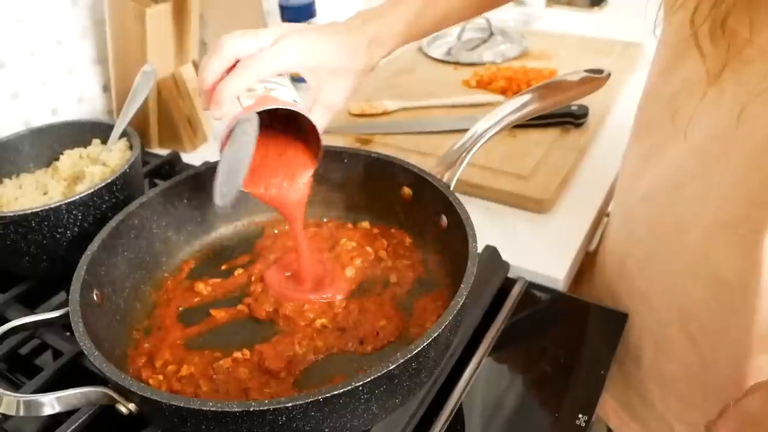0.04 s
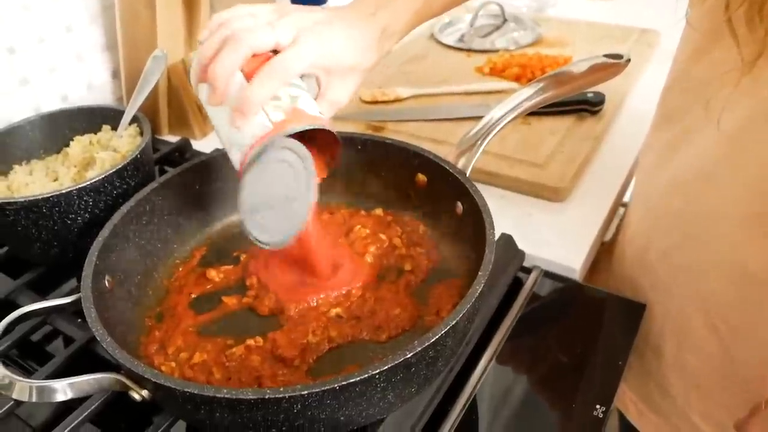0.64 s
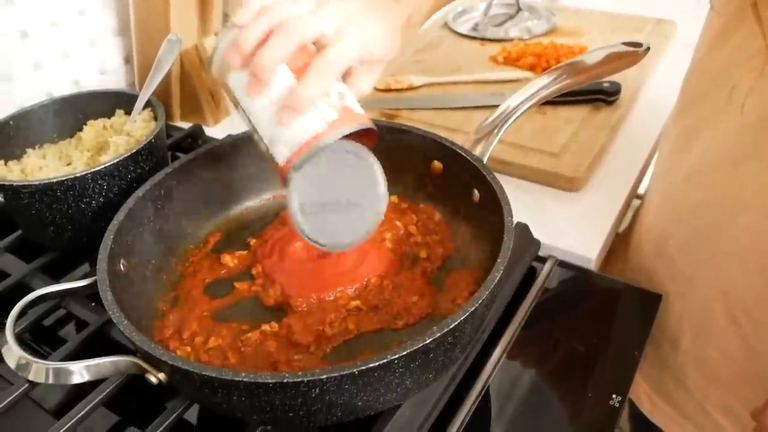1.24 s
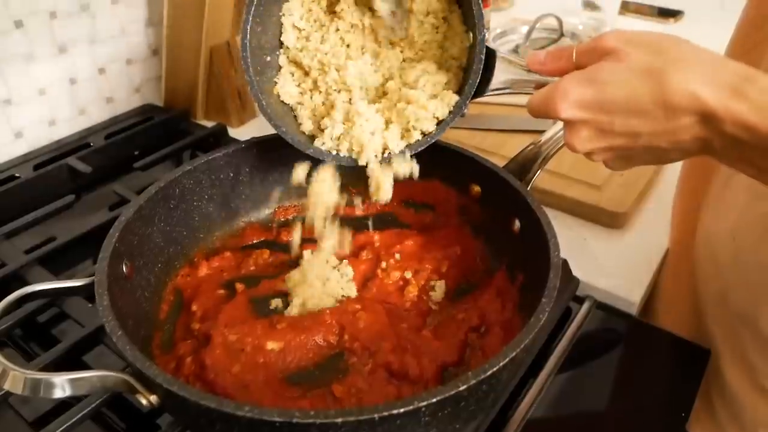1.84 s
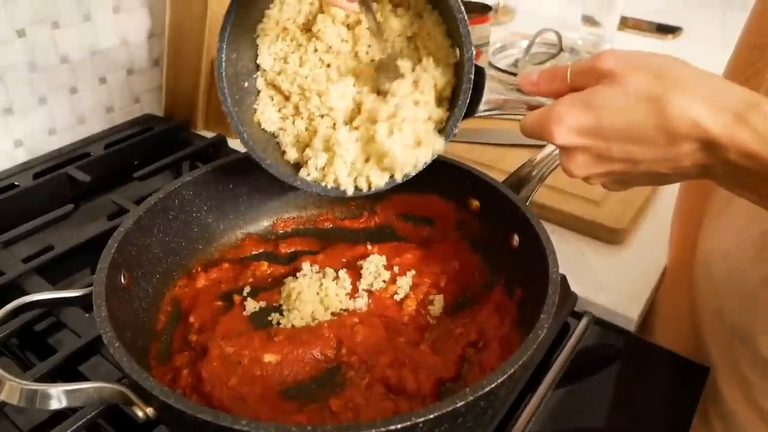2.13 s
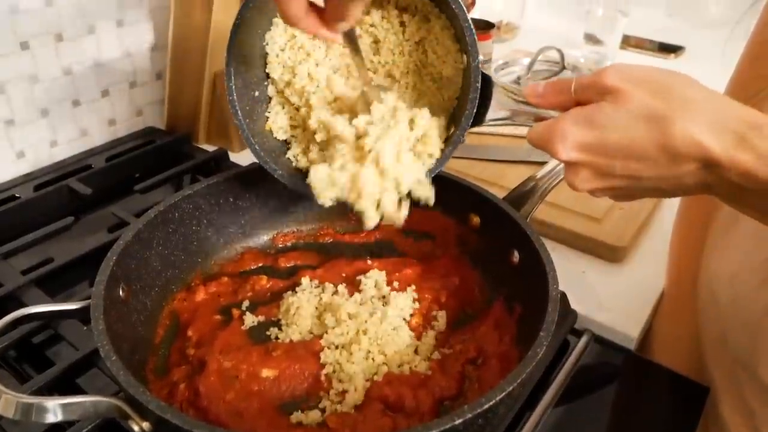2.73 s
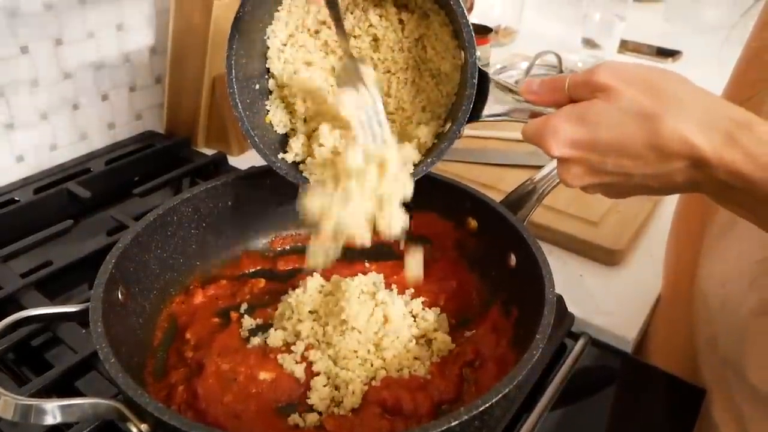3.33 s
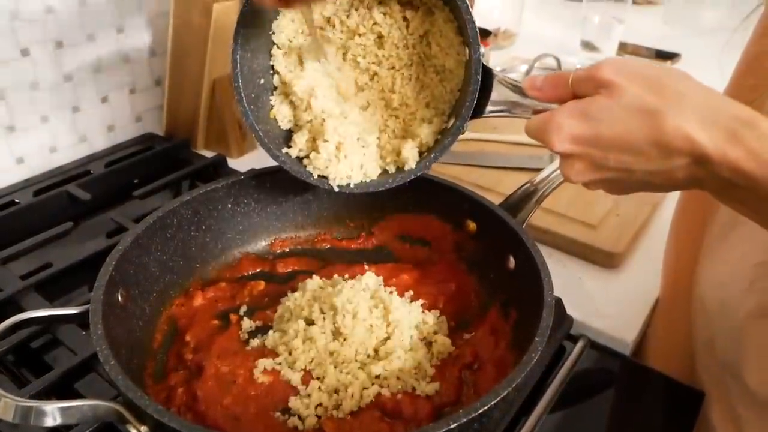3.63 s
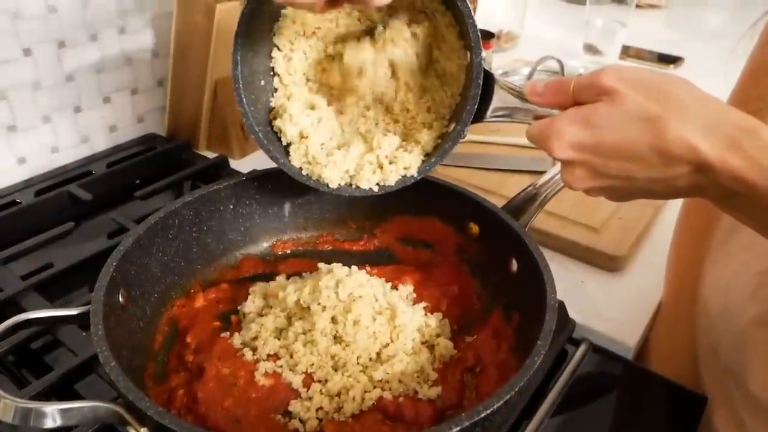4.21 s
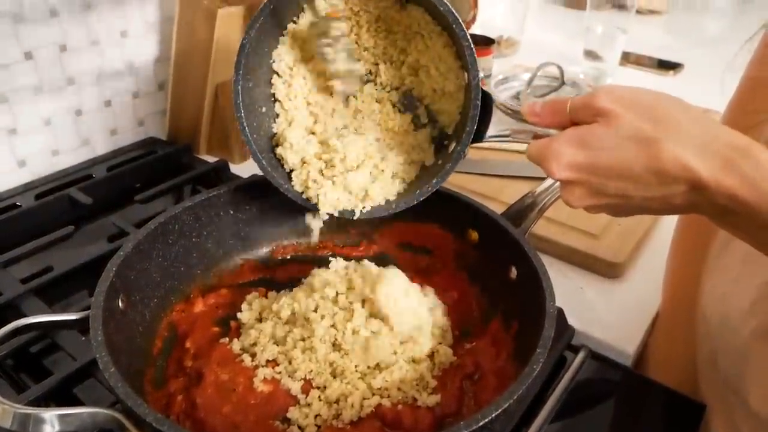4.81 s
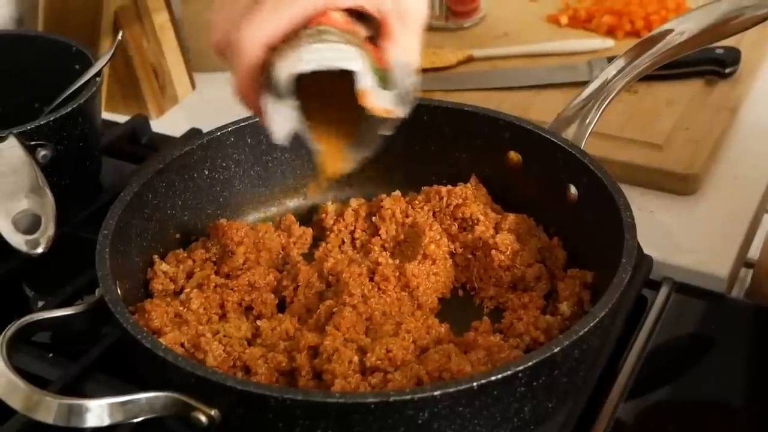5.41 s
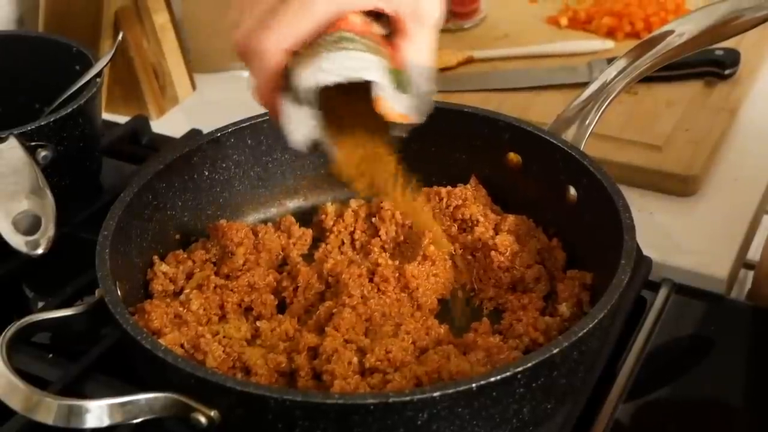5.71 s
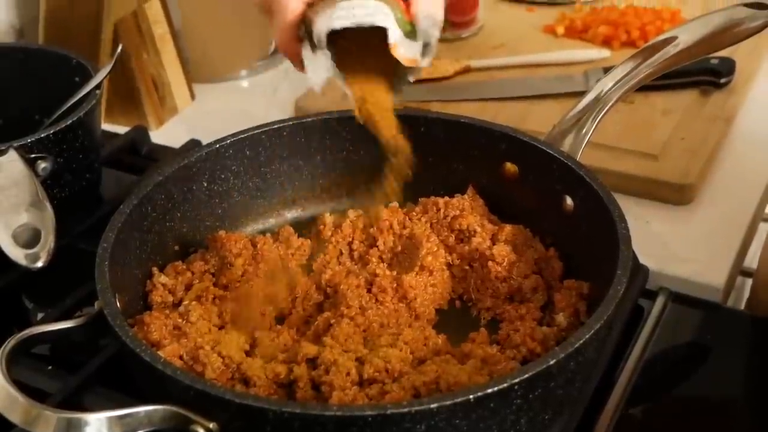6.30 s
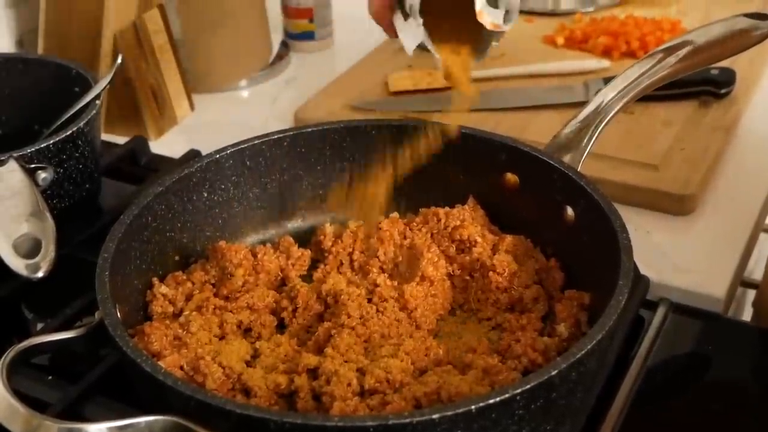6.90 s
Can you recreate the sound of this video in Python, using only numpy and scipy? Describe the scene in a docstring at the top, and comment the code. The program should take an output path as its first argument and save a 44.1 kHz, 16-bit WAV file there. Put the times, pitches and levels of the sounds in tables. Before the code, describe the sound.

Close sizzling cuts to a pot knocking a pan and a fork scraping out grain, followed by the soft rustle of shaken spice.

```python
"""Cooking at a home stove

Close to the pan in a kitchen, everything centred on a stereo microphone; three moments, changing abruptly.
Tomato sauce fries in pops and steam bubbles. A pot bumps the pan, and a fork clinks, scrapes and
squeaks on the steel as it pushes cooked grain out. Then ground spice is shaken from a small box.
A faint sizzle lies under the last two moments, and an appliance hums in the background throughout."""
import sys
import numpy as np
from scipy import signal
from scipy.fft import rfft, irfft
from scipy.io import wavfile
from scipy.ndimage import uniform_filter1d

SR = 44100
rng = np.random.default_rng(int(sys.argv[2]) if len(sys.argv) > 2 else 0)


def store_wav(level_fs):
    """Save 16-bit WAV to argv[1]."""
    pcm = np.round(np.clip(np.atleast_2d(level_fs), -1, 1) * 32767)
    wavfile.write(sys.argv[1], SR, pcm.T.astype(np.int16))


N = 315315
T = np.arange(N) / SR
SAUCE_END_S, SPICE_START_S = 1.652, 5.017

# fierce frying, heard close: frequency_hz, density_db
SAUCE_SPECTRUM = [(180, -58), (300, -16), (492, -8.5), (517, -6.5), (892, -9), (1090, -3.5), (1370, -5.5),
                  (1640, -7.5), (2400, -9), (4800, -4), (6680, -8), (8560, -4), (10600, -13), (13100, -9),
                  (15500, -16.5)]
# the pan under the sauce: pitch_hz, width_hz, level_db
SIZZLE_RESONANCES = [(825, 25, 9.5), (1062, 116, 5.5), (1250, 80, -3), (1570, 170, 7)]
# the fork strikes the pot: start_s, level_db, depth in the grain (0 bare, 1 buried)
FORK_BLOWS = [(2.141, -18, 0.94), (2.778, -22, 0), (3.2605, -1.5, 0.09), (3.807, -12, 0.71),
              (3.845, -16, 0.56), (4.427, -15, 1), (4.986, -24, 0.65)]
# the fork drags along the pot wall: start_s, length_s, level_db
FORK_SCRAPES = [(2.151, 0.059, -16.5), (3.807, 0.056, -22.5), (4.503, 0.066, -17.5)]
# the pot under the fork: pitch_hz, level_db, t60_s
POT_MODES = [(647, -38, 0.41), (1566, -3, 0.07), (1594, -17, 0.25), (1630, -23, 0.26), (2710, -17, 0.028),
             (2977, -18, 0.024), (2970, -36, 0.33), (2945, -16.5, 0.042), (3070, -36, 0.5),
             (4420, -21.5, 0.066), (4590, -29, 0.2), (5280, -13, 0.028), (5810, -15.5, 0.03),
             (6750, -37, .1), (6730, -26, 0.11), (7700, -17.5, 0.024), (8870, -17.5, 0.025),
             (9840, -35.5, 0.22), (11380, -26.5, 0.089), (12480, -33, 0.09)]
# the pot's dense, bright ring: frequency_hz, density_db
STEEL_SPECTRUM = [(400, -5), (700, 4), (1100, -3.5), (2000, -9), (2750, 8), (3700, -5.5), (5300, -2.5),
                  (7000, 0), (8300, -22), (9500, -4), (10700, -20), (12500, -14), (15500, -18)]
# the dull thud of its load of grain: frequency_hz, density_db
THUD_SPECTRUM = [(260, -8.5), (420, 8.5), (650, 1.5), (1100, 4), (1700, -62), (4000, -57)]
# pot and pan knocked together: pitch_hz, level_db, t60_s
BUMP_MODES = [(447, -25, 0.62), (503, -12.5, 0.07), (542, -29, 0.98), (564, -27.5, 0.61), (638, -25, 0.59),
              (730, -28.5, 0.84), (836, -24, 0.41), (994, -21, 0.6), (1002, -5, 0.072), (1087, -26.5, 0.54),
              (1220, -30, 0.24), (1464, -5, 0.051), (1716, -25.5, 0.54), (1950, -31, 0.35),
              (2210, -33.5, 0.42), (2460, -29.5, 0.46), (3330, -31, 0.18), (3500, -47, 0.98)]
# the first crack of that bump: frequency_hz, density_db
CRACK_SPECTRUM = [(440, -3), (700, -6), (1300, -1), (2800, -7), (4300, -16), (5600, -14), (7000, -23),
                  (9000, -21), (11000, -35), (15000, -38)]
# the stove grate rattling under it: frequency_hz, density_db
GRATE_SPECTRUM = [(85, -15.5), (150, -8.5), (300, -7.5), (500, -7), (1000, -9), (1500, -9.5), (2400, -20),
                  (3500, -24.5), (6000, -43), (15000, -100)]
# low resonances of stove and room: pitch_hz, level_db, t60_s
BOOM_MODES = [(104, -48, 1.2), (171, -34, .9), (232, -38, 1.6), (323, -37, 1.9)]
# the fork's tip squeaks on the pot wall: start_s, length_s, level_db, swell_db, rasp_db, groan_db
FORK_SQUEAKS = [(4.194, 0.02, -25, -4, -6, -21), (4.219, 0.0071, -16, -2, -7, -25),
                (4.231, 0.067, -14, -0.5, -6.5, -29), (4.983, 0.027, -22.5, 2, -15, -15.5)]
# the rasp of the slipping tip: frequency_hz, density_db
RASP_SPECTRUM = [(300, -6), (450, 6), (800, -11), (1500, -1.5), (2700, 11.5), (5000, -6), (7300, 2),
                 (8300, -9), (8850, 7), (9400, -7), (10400, -21), (11700, -6), (12350, -3), (15500, -25)]
# the pot's hollow groan under the tip: frequency_hz, density_db
GROAN_SPECTRUM = [(330, -10.5), (430, -4), (560, -14.5), (1000, -32.5)]
# the tines' after-ring, a cluster of close modes: frequency_hz, density_db
TINE_SPECTRUM = [(1200, -40), (2050, -11), (2260, -3), (2330, -2), (2400, -8), (2600, -23), (4000, -39)]
# thin ticks of grain and fork tip: start_s, level_db
GRAIN_TICKS = [(2.434, -38.5), (2.468, -42), (4.4296, -28.5), (4.862, -41.5), (4.913, -39)]
# their crisp colour: frequency_hz, density_db
TICK_SPECTRUM = [(2000, -11), (5000, 0), (9000, -1), (10500, -8), (12500, 3), (15500, -9)]
# short soft tones between the strokes: start_s, length_s, pitch_hz, level_db
SOFT_TONES = [(1.821, 0.044, 727, -38.5), (2.349, 0.077, 719, -42.5), (2.783, 0.068, 641, -47.5),
              (2.995, 0.083, 711, -50.5)]
# vigour of the shaking, as loudness of the powder: time_s, level_db
SHAKE_VIGOUR = [(5.05, -50.5), (5.25, -56.5), (5.65, -46.5), (5.95, -45.5), (6.25, -48.5), (6.5, -52.5),
                (6.8, -51), (7.1, -51.5)]
# sliding powder: frequency_hz, density_db
POWDER_SPECTRUM = [(600, -0.5), (1700, 1.5), (2700, 0.5), (5000, 1.5), (7000, 1), (8700, 5), (10700, -6),
                   (13000, 1), (15500, -5.5)]
# the box knocks in the hand on the harder turns: start_s, level_db
BOX_KNOCKS = [(5.026, -41.5), (5.409, -42.5), (5.792, -41), (6.031, -44), (6.069, -42), (6.209, -43),
              (6.428, -40), (6.634, -43)]
# the hollow box: frequency_hz, density_db
BOX_SPECTRUM = [(200, -35), (600, -4), (1200, 5), (1800, 0), (2800, -7.5), (6000, -13), (15000, -30)]
# faint frying under the grain: frequency_hz, density_db
SIMMER_SPECTRUM = [(1500, -3), (3000, -7), (4700, -0.5), (6800, -4.5), (8600, -0.5), (10600, -11),
                   (13000, -8), (15500, -14.5)]
# the kitchen's room tone: frequency_hz, density_db
ROOM_SPECTRUM = [(20, -2.5), (60, 3), (105, -6.5), (210, -0.5), (330, -3), (600, -1.5), (1100, -2.5),
                 (1350, -7), (1650, -5.5), (2400, -14.5), (5000, -19.5), (15000, -44)]
# partials of the appliance's hum: pitch_hz, level_db
HUM_PARTIALS = [(263.8, -72.5), (527.6, -59), (1093, -72), (1669, -71)]
# room tone that differs between left and right: frequency_hz, density_db
DIFFUSE_SPECTRUM = [(20, -16), (70, -13), (200, -10.0), (1500, -15.5), (15000, -18.5)]


def sauce(level_db=-39.5, bubble_db=-16, pan_db=-3):
    """Fierce, steady frying up close: thousands of pops a second and larger bubbles ring the pan."""
    pops = crackle(rate=7000, spread_db=1.0) + undb(bubble_db) * unit(bubbles())
    sizzle = colour(pops, SAUCE_SPECTRUM)[:int(SAUCE_END_S * SR)]
    pan = sum(undb(db) * signal.lfilter(*signal.iirpeak(hz, hz / width, fs=SR), sizzle)
              for hz, width, db in SIZZLE_RESONANCES)
    out = np.zeros(N)
    add(out, 0, unit(sizzle + undb(pan_db) * pan))
    return out * undb(level_db + 0.31 * walk(20))


def bubbles(count=1500, low_hz=1820, high_hz=9000, cycles=7, spread_db=1.0):
    """Steam bubbles burst in the sauce, each ringing a few cycles at its own pitch."""
    out = np.zeros(N)
    for when, pitch, size in rng.random((count, 3)):
        hz = low_hz * (high_hz / low_hz) ** pitch
        turns = hz * T[:int(2 * cycles * SR / hz)]
        ping = np.exp(-np.pi * turns / cycles) * np.sin(2 * np.pi * turns)
        add(out, when * SAUCE_END_S, undb(-spread_db * np.log(size)) * ping)
    return out


def fork(bare_thud_db=-45, buried_thud_db=-12.5):
    """Blows ring the steel and thud in the grain; scrapes ring it with a run of tiny catches."""
    out = np.zeros(N)
    for at, db, depth in FORK_BLOWS:
        thud_db = bare_thud_db + depth * (buried_thud_db - bare_thud_db)
        add(out, at, undb(db) * (steel(depth) + undb(thud_db) * burst(THUD_SPECTRUM, t60=0.067)))
    for at, length, db in FORK_SCRAPES:
        size = int(length * SR)
        catches = crackle(rate=890, spread_db=-1, size=SR)[:size] * signal.windows.tukey(size, .5)
        add(out, at, undb(db) * signal.fftconvolve(catches / np.sqrt(size), steel(depth=0.4)))
    return out


def steel(depth, buried_mute_db=-28.5, ring_db=-5, tick_db=-19, room_db=-39):
    """The pot's answer to one touch of the fork; grain round the fork mutes the low modes."""
    modes = ring(POT_MODES, low_db=buried_mute_db * depth, detune=0.0046, scatter_db=2.5)
    tick = undb(tick_db) * burst(STEEL_SPECTRUM, t60=0.087)
    room = undb(room_db) * burst(STEEL_SPECTRUM, t60=0.7)
    return undb(ring_db) * no_bass(modes, hz=400) + tick + room


def pot_bump(crack_db=-14, rattle_db=-26, room_db=-47, boom_db=-1, build_s=0.019):
    """The heavy pot hits the pan: a crack, ringing metal, a rattling grate, then a lingering boom."""
    tail = signal.sosfilt(signal.butter(2, 700, fs=SR, output="sos"), burst(GRATE_SPECTRUM, t60=6.8))
    build = 1 - np.exp(-T[:2 * SR] / build_s)
    boom = (undb(boom_db) * ring(BOOM_MODES) + undb(room_db) * tail) * build
    blow = ring(BUMP_MODES) + undb(crack_db) * burst(CRACK_SPECTRUM, t60=0.067)
    rattle = undb(rattle_db) * burst(GRATE_SPECTRUM, t60=1.0)
    out = np.zeros(N)
    add(out, at=1.8605, sound=no_bass(blow, hz=250) + rattle + boom)
    return out


def squeaks(pitch_hz=2310, slips_per_s=92, tine_lag_s=.0014, light_fade_db=-12, pressed_fade_db=-9,
            light_rasp_db=-9, tine_ring_db=-68, room_db=-58):
    """The tip catches and slips as pressure swells and eases; the tines chatter and the steel rings on."""
    out = np.zeros(N)
    lag = np.exp(-T[:SR // 20] / tine_lag_s)
    for at, length, db, swell_db, rasp_db, groan_db in FORK_SQUEAKS:
        pressure = np.sin(np.pi * np.minimum(T[:SR] / length, 1))
        slip_progress = np.cumsum(slips_per_s * (1 + .1 * walk(78, size=SR))) / SR % 1
        # each slip dies away, less so under pressure
        fade_db = slip_progress * (light_fade_db + pressure * (pressed_fade_db - light_fade_db))
        grip = undb(db + swell_db * (pressure - 1) + fade_db) * (T[:SR] < length)
        envelope = signal.fftconvolve(grip, lag / lag.sum())[:SR]  # the tines lag behind the grip
        phase = 2 * np.pi * np.cumsum(pitch_hz * (1 + 0.033 * walk(620, size=SR))) / SR
        friction = rng.standard_normal(SR) * (1 + np.cos(phase))  # rasps once a cycle
        rasp = undb(rasp_db + light_rasp_db * (1 - pressure)) * colour(friction, RASP_SPECTRUM)
        groan = undb(groan_db) * colour(rng.standard_normal(SR), GROAN_SPECTRUM)
        add(out, at, envelope * (np.sin(phase) + rasp + groan))
    tines = undb(tine_ring_db) * burst(TINE_SPECTRUM, t60=0.88)
    room = undb(room_db) * burst(STEEL_SPECTRUM, t60=0.49)
    return (out + signal.fftconvolve(out, tines + room)[:N]) * (T < SPICE_START_S)


def spice(first_s=5.047, period_s=.097, slowing_s=.00048, slide_s=.085, trickle_db=-10.5, rattle_db=-6):
    """Powder slides on each shake, about ten a second, and trickles between; the box rattles and knocks."""
    flow, box = np.zeros(N), np.zeros(N)
    vigour = np.transpose(SHAKE_VIGOUR)
    trickle = undb(trickle_db + np.interp(T, *vigour)) * (T > SPICE_START_S)
    for k, (scatter_db, stretch, knock, lag) in enumerate(rng.standard_normal((21, 4))):
        at = first_s + k * (period_s + slowing_s * k / 2)  # the wrist slows a little
        db = np.interp(at, *vigour) + scatter_db
        length = slide_s * np.exp(0.33 * stretch)
        add(flow, at - length / 2, undb(db) * signal.windows.cosine(int(length * SR)))
        rattle = undb(db + rattle_db + 2 * knock) * burst(BOX_SPECTRUM, t60=0.048)
        add(box, at + np.tanh(lag) * slide_s / 4, rattle)
    for at, db in BOX_KNOCKS:
        add(box, at, undb(db) * burst(BOX_SPECTRUM, t60=0.057))
    clumps = undb(1.5 * walk(60))
    powder = colour(crackle(rate=15000, spread_db=3.5), POWDER_SPECTRUM)
    return clumps * np.hypot(flow, trickle) * powder + box


def ticks():
    """Grain and fork tip make tiny dry snaps, nearly all treble."""
    out = np.zeros(N)
    for at, db in GRAIN_TICKS:
        add(out, at, undb(db) * burst(TICK_SPECTRUM, t60=0.02))
    return out


def hollow_tones(sag=0.044):
    """Brief, soft tones between the strokes, sinking a little in pitch."""
    out = np.zeros(N)
    for at, length, hz, db in SOFT_TONES:
        size = int(length * SR)
        pitch = hz * (1 + sag * np.linspace(.5, -.5, size) + 0.018 * walk(200, size=SR)[:size])
        tone = np.sin(2 * np.pi * np.cumsum(pitch) / SR)
        add(out, at, undb(db) * signal.windows.tukey(size, .5) * tone)
    return out


def simmer(covered_db=-51.5, mixed_db=-56):
    """Under the grain the frying is faint, and fainter once all is mixed."""
    level_db = np.where(T < SPICE_START_S, covered_db, mixed_db)
    sizzle = colour(crackle(rate=4500, spread_db=2.0), SIMMER_SPECTRUM)
    return sizzle * undb(level_db + 0.89 * walk(25))


def kitchen(air_db=-54, hum_db=-1, late_air_db=-2.5, late_hum_db=1.5):
    """Behind the stove: room tone and an appliance's wavering hum, which stands out more under the spice."""
    late = T > SPICE_START_S
    clock = np.cumsum(1 + 0.00097 * walk(8.3)) / SR
    hum = sum(undb(db + 2.0 * walk(4.7)) * np.sin(2 * np.pi * hz * clock) for hz, db in HUM_PARTIALS)
    air_gain = undb(air_db + late * late_air_db + .5 * walk(2.5))
    air = air_gain * colour(rng.standard_normal(N), ROOM_SPECTRUM)
    return air + undb(hum_db + late * late_hum_db) * np.sqrt(2) * hum


def ring(modes, low_db=0, detune=0.00097, scatter_db=0):
    """Struck modes; the contact sets the weight of those under 2 kHz and varies the rest."""
    out = 0
    for k, (hz, db, t60) in enumerate(modes):
        weight_db = low_db if hz < 2000 else scatter_db * rng.standard_normal()
        pitch = hz * (1 + detune * rng.standard_normal())
        out += (-1) ** k * undb(db + weight_db) * fade(t60) * np.sin(2 * np.pi * pitch * T[:2 * SR])
    return out


def burst(spectrum, t60):
    """Countless close modes struck at once: dying coloured noise that starts at an rms of 1."""
    decay = fade(t60)
    return colour(rng.standard_normal(len(decay)) * decay, spectrum) * np.sqrt(np.mean(decay ** 2))


def crackle(rate, spread_db, size=N):
    """Random tiny clicks of uneven size, about rate a second; rms 1."""
    sizes = undb(spread_db * np.minimum(rng.exponential(size=size), 5))
    return unit((rng.random(size) < rate / SR) * sizes * rng.choice([-1, 1], size))


def colour(x, spectrum):
    """Shape a sound by (frequency_hz, density_db) points, with nothing ahead of an attack; rms 1."""
    hz, db = np.transpose(spectrum)
    f = np.fft.rfftfreq(len(x), 1 / SR) + 1
    gain = np.minimum(f / hz[0], 1) ** 2 * undb(np.interp(np.log(f), np.log(hz), db))
    cepstrum = irfft(np.log(gain), len(x))[:len(x) // 2]
    minimum_phase = np.exp(2 * rfft(cepstrum, len(x)))
    return unit(irfft(rfft(x) * minimum_phase, len(x)))


def no_bass(x, hz):
    """Small objects radiate little below hz."""
    return signal.sosfilt(signal.butter(4, hz, "high", fs=SR, output="sos"), x)


def walk(rate, size=N):
    """Smooth random drift of rms 1 that changes about rate times a second."""
    width = max(int(SR / rate), 1)
    drift = uniform_filter1d(rng.standard_normal(size), width, mode="wrap")
    return unit(uniform_filter1d(drift, width, mode="wrap"))


def fade(t60):
    """Two seconds of exponential decay, falling 60 dB in t60 seconds."""
    return np.exp(-np.log(1000) * T[:2 * SR] / t60)


def undb(db):
    """Decibels to gain."""
    return 10 ** (np.asarray(db) / 20)


def unit(x):
    """Scale to an rms of 1."""
    return x / np.sqrt(np.mean(x ** 2) + 1e-18)


def add(track, at, sound):
    """Mix a sound into a track at a time in seconds."""
    start = int(at * SR)
    track[start:start + len(sound)] += sound[:N - start]


def scene(hiss_side_db=-19, room_side_db=-69, echo_side_db=-38, echo_s=.007):
    """The stove is dead ahead of the microphone; a little hiss, room tone and a wall echo give width."""
    frying = sauce() + simmer()
    utensils = pot_bump() + fork() + squeaks() + ticks()
    mid = frying + utensils + hollow_tones() + spice() + kitchen()
    diffuse = colour(rng.standard_normal(N), DIFFUSE_SPECTRUM)
    hiss = np.diff(sauce(), prepend=0) + simmer()
    side = undb(hiss_side_db) * hiss + undb(room_side_db) * diffuse
    add(side, echo_s, undb(echo_side_db) * utensils)
    return np.array([mid + side, mid - side])


def record(dry):
    """The recorder clips at full scale and cuts the treble above 15750 Hz."""
    return signal.sosfilt(signal.ellip(10, .1, 80, 15750, fs=SR, output="sos"), np.clip(dry, -1, 1))


dry = scene()
out = record(dry)
store_wav(out)
```